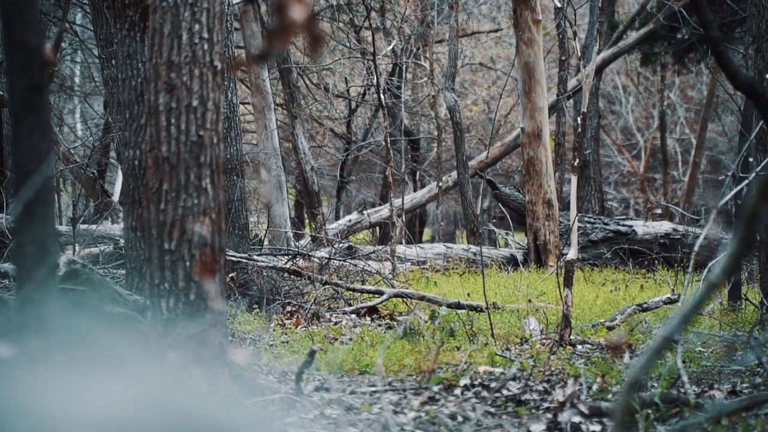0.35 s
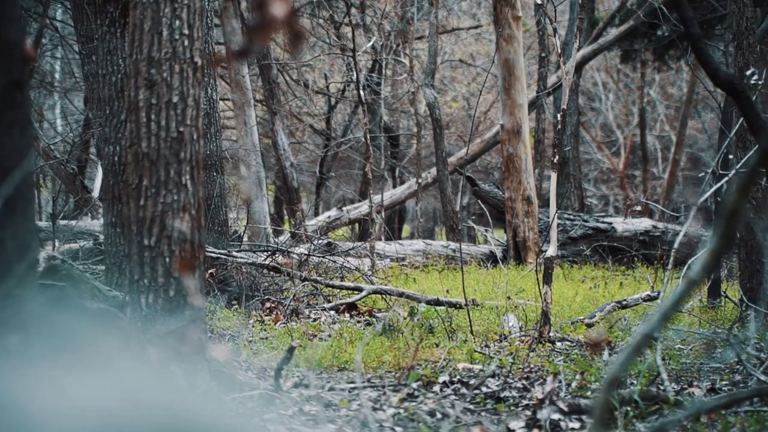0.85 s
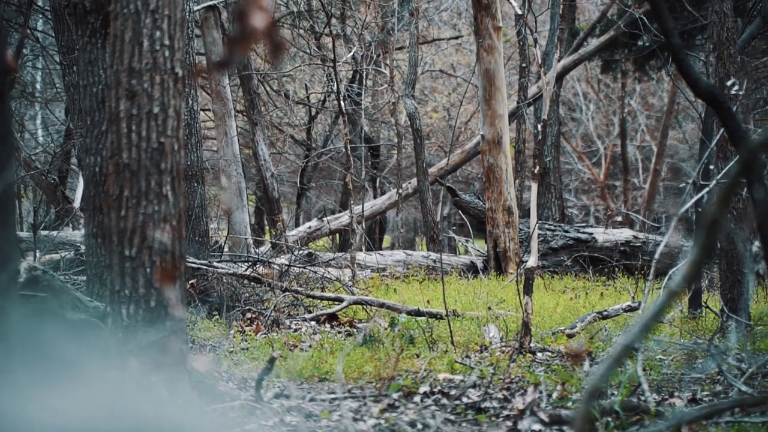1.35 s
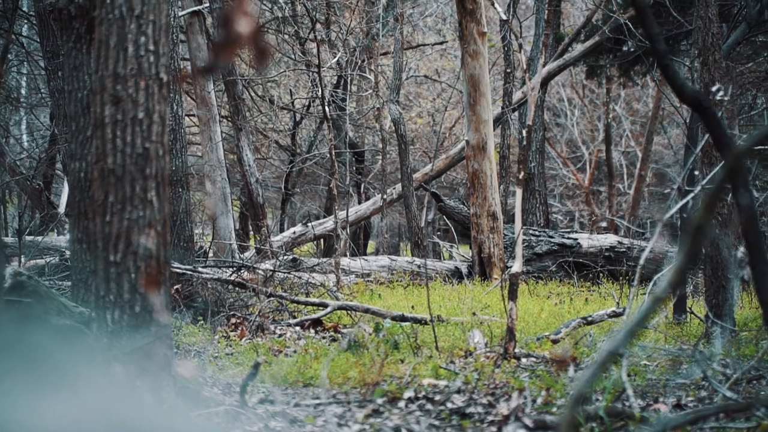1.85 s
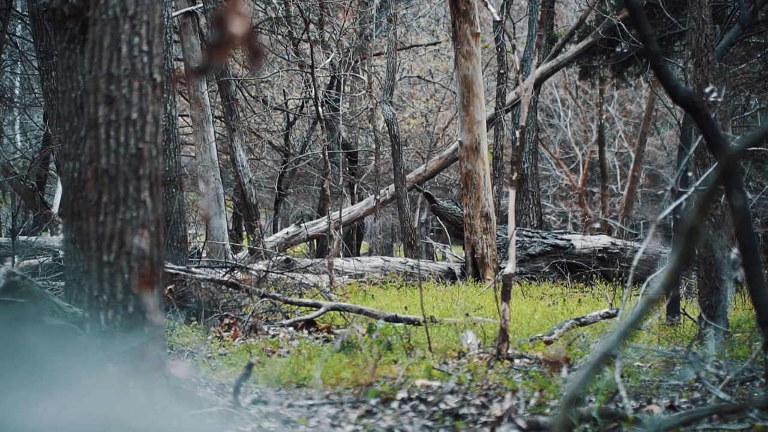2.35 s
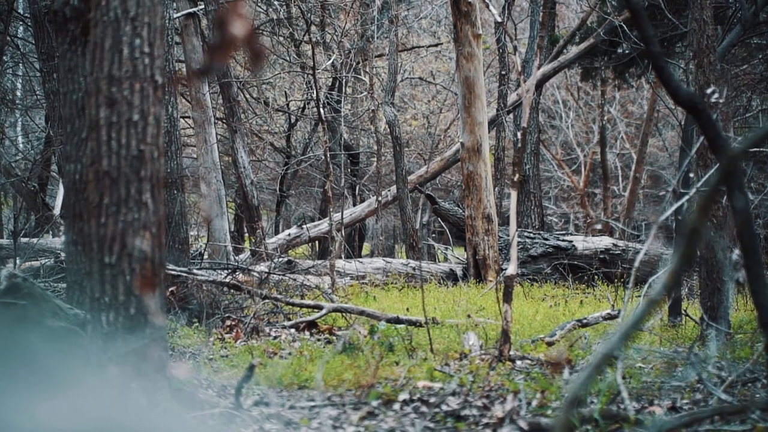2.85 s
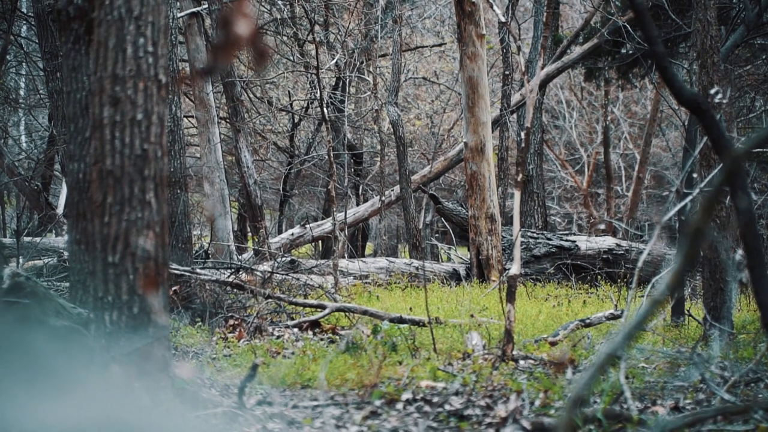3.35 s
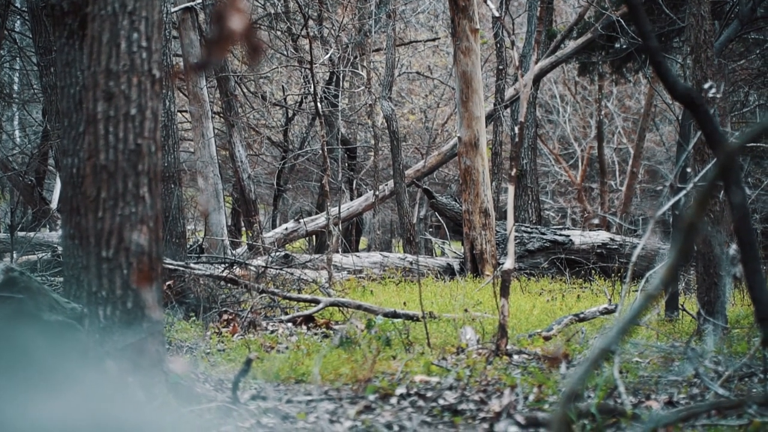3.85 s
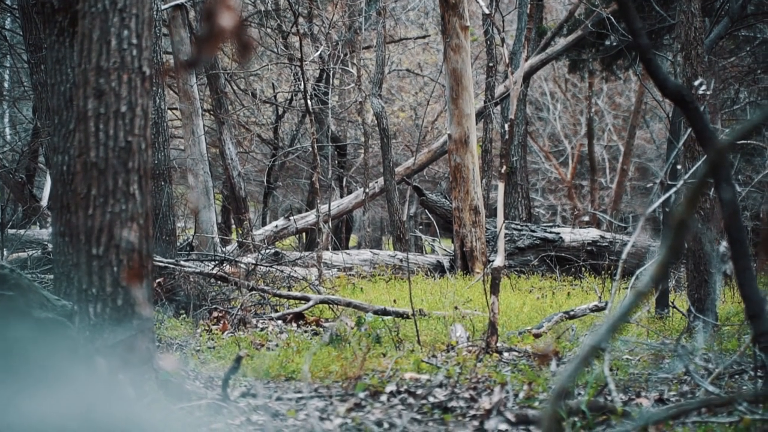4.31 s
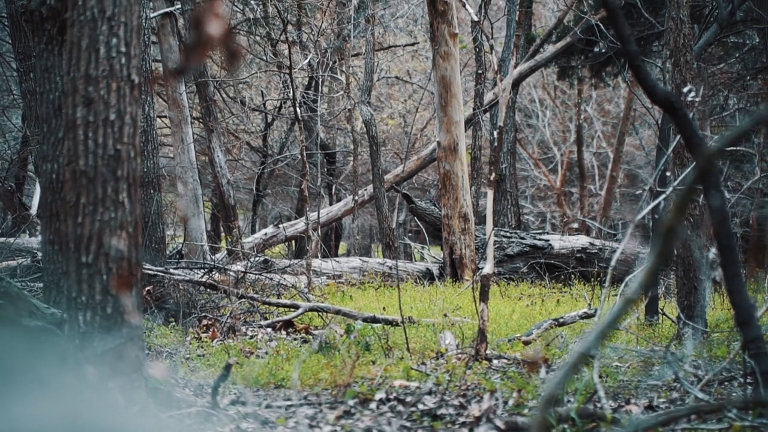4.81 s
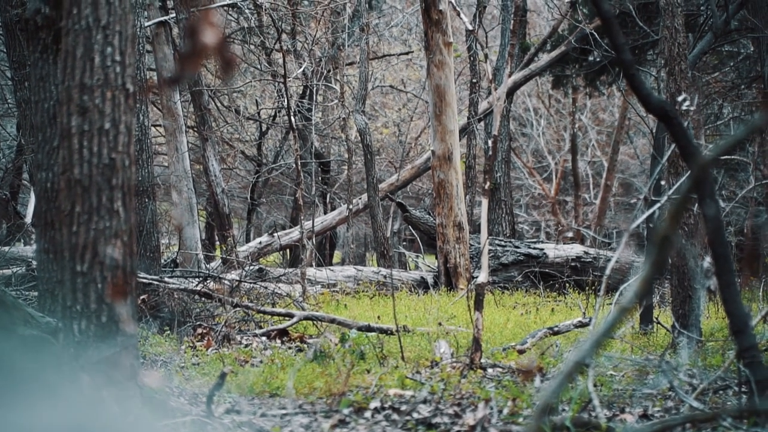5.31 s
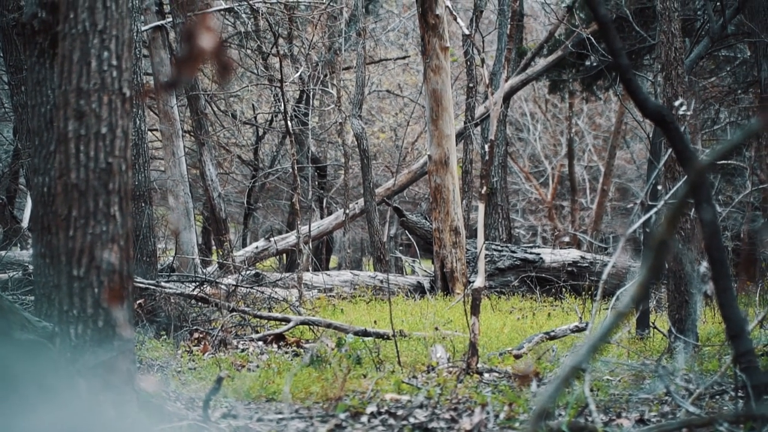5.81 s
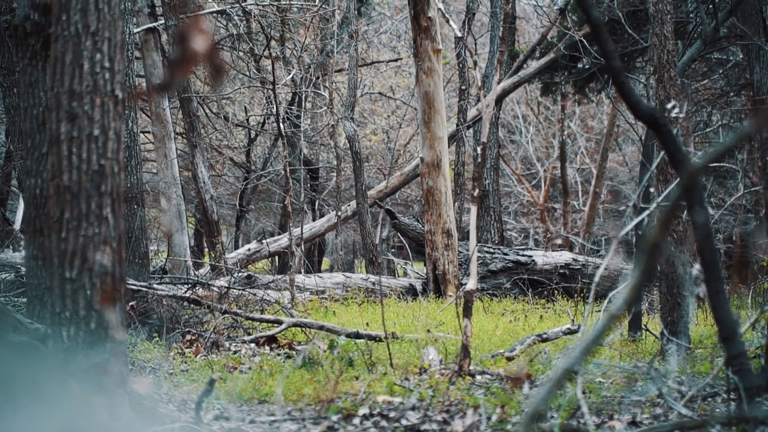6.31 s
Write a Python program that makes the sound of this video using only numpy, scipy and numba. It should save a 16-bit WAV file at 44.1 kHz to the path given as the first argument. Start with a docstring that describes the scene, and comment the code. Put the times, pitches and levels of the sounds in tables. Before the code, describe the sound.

A quiet woodland hush, dark and soft, with gentle low wind lumps on the microphone that ease slightly. From 0 to 3 s, breathy hoarse caws repeat far off, every half second or so; a thin two-voiced bird wheezes at 0.2 and 1.4 s, and faint whistles pass. A small woody knock comes at 2.1 s, a crisp tick at 2.8. At 3.1 s a distant turkey gobbles: a brighter opening bark, then rapid hoarse syllables sinking and fading until about 4.5 s, smeared by tree echoes. Around 4.6-4.9 s come ticks, tiny bird chips and a very high three-note song, with more caws. Close and almost dry, a thin whistle at 5.1 s dips then rises until 5.2; faint air and flaps follow. Three loud, nasal, raspy hen yelps, each about 0.13 s, burst at 5.4, 5.7 and 6.0 s, with slight echo, before the hush returns.

```python
"""Forest hush and light wind come first, with far hoarse caws, thin songbirds and small ticks over them.
A far turkey then gobbles, blurred by echoes from the trees: hoarse beats ring in a sinking windpipe.
Last come hen-turkey yelps close to the microphone, perhaps blown on a reed call: a whistle that dips and
then rises, and three raspy yelps. A fluttering membrane puffs air into a cavity that opens and shuts.
Birdsong is built from unsteady sines, caws, hush and wind from filtered noise, ticks from short rings."""
import sys
import numpy as np
from scipy import signal
from scipy.fft import rfft, irfft, next_fast_len
from scipy.io import wavfile
from scipy.ndimage import uniform_filter1d, minimum_filter1d, map_coordinates
from numba import njit

SR = 44100
rng = np.random.default_rng(int(sys.argv[2]) if len(sys.argv) > 2 else 0)


def int16_out(signal):
    """Quantize to a 16-bit WAV file."""
    q = np.round(np.clip(np.atleast_2d(signal).T, -1, 1) * 32767)
    wavfile.write(sys.argv[1], SR, q.astype(np.int16))


def boost(x):
    """Linear amplitude factor 10**(x/20) for a level x in decibels (scalar or array-like)."""
    u = np.asarray(x, float) / 20
    return 10 ** u


N = 283563  # length in samples

# The whistle before the yelps; levels are those entering the cavity.
# Columns: time_s, level_db, membrane_hz, rasp (0-1)
CALL_WHISTLE = [(5.064, -79.5, 1480, 0.54), (5.069, -39.5, 1515, 0.41), (5.086, -62, 1535, 0.5),
                (5.094, -38, 1530, 0.51), (5.104, -33, 1420, 0.05), (5.132, -36.5, 1288, .12),
                (5.16, -28, 1223, 0.05), (5.192, -24, 1280, 0.01), (5.209, -23, 1527, 0),
                (5.217, -41, 1816, 0)]
# The three raspy yelps; the last pip is a level change as each yelp closes.
# Columns: voice_on_s, burst_s, end_s, last_pip_db, every_fourth_beat (0-1)
CALL_YELPS = [(5.393, 5.411, 5.528, -8, 0.12), (5.699, 5.713, 5.824, -1.5, 1.0),
              (6.019, 6.029, 6.149, -8, 1)]
# The shape all yelps share, in three parts timed from voice on, burst and end; levels enter the cavity.
# Columns: time_from_mark_s, level_db, membrane_hz, cavity_low_edge_hz, rasp (0-1)
YELP_ONSET = [(0.00069, -21.5, 1490, 1050, 0.9)]
YELP_BURST = [(-.005, -13.5, 1512, 847.3, 0.78), (.002, -9, 1472, 771, 0.41), (.017, -16.5, 1362, 680, .65)]
YELP_CLOSE = [(-.046, -17, 1388, 689, .7), (-.03, -17.5, 1413, 843.2, 0.5), (-.011, -14, 1560, 1370, .2),
              (0, -41.5, 1530, 1500, .3)]
# Single flaps of the idle membrane, before the flap gain and the cavity. Columns: time_s, level_db
STRAY_FLAPS = [(5.2384, -47), (5.2589, -44), (5.2624, -43.5), (5.2684, -52), (5.2764, -51), (5.2824, -47),
               (5.2864, -51.5), (5.2914, -49), (5.3298, -49), (5.3344, -49), (5.365, -48.5), (6.006, -51.5)]
# Air slipping past the idle membrane, before its wavering and the cavity. Columns: time_s, level_db
AIR_LEAK = [(5.212, -48), (5.25, -55.5), (5.31, -71.5), (5.36, -55.5), (5.39, -50.5)]


def near_call():
    """A whistle with the cavity nearly shut, a pause of leaking air and stray flaps, then yelps of one shape."""
    out = np.zeros(N)
    start, (db, hz, rasp) = span(CALL_WHISTLE)
    # the treble dulls by 0.04 dB per Hz as the membrane tightens; rasp brightens it
    treble_db = 4.5 - 0.04 * (hz - hz.min()) + 16 * rasp
    second = np.full(len(hz), 0.12)
    fourth = np.zeros(len(hz))
    whistle = voiced(db, hz, 0.77 * hz, second, fourth, rasp, treble_db, breath_db=26)
    add(out, start, whistle)

    shut_hz, open_hz = 1340, 680  # low edge of the cavity when shut and open
    for on, burst, end, pip_db, fourth in CALL_YELPS:
        lead_s = 0.016 if on == CALL_YELPS[0][0] else 0.005  # the first yelp eases in longer
        rows = [(on - lead_s, -47, 1520, 1401, -0.3)]  # a thin start
        for mark, part in (on, YELP_ONSET), (burst, YELP_BURST), (end, YELP_CLOSE):
            rows += [(mark + s, *rest) for s, *rest in part]
        start, (db, hz, edge_hz, rasp) = span(rows)
        opening = np.clip((shut_hz - edge_hz) / (shut_hz - open_hz), 0, 1)
        pip_from = (end + YELP_CLOSE[1][0]) * SR
        pip_full = (end + YELP_CLOSE[2][0]) * SR
        db = db + pip_db * np.interp(start + np.arange(len(db)), [pip_from, pip_full], [0, 1])
        treble_db = 2.5 - 0.0872 * (hz - hz.min())
        second = 0.7 * opening ** 2
        yelp = voiced(db, hz, edge_hz, second, fourth * opening, rasp, treble_db, breath_db=19.5)
        add(out, start, yelp)

    flaps, breath = np.zeros(N), np.zeros(N)
    for s, db in STRAY_FLAPS:
        flaps[round(s * SR)] = boost(db + 18)
    start, (db,) = span(AIR_LEAK)
    leak = boost(db + 3 * wobble(150, len(db))) * rng.standard_normal(len(db))
    add(breath, start, leak)
    idle = cavity(flaps + boost(-5.5) * breath, breath, np.full(N, 1150), np.full(N, 15.0))
    return out + idle[:N]


def voiced(db, hz, edge_hz, second, fourth, rasp, treble_db, breath_db):
    """The membrane beats while air rushes past it; a rasping membrane wanders off its pitch."""
    hz = uniform_filter1d(hz, size=500, mode="nearest")  # the tension changes smoothly
    rasp = np.abs(rasp)
    hz = hz * (1 + 0.015 * rasp * wobble(60, len(hz)))
    breath = boost(db + breath_db) * (0.16 + rasp) * rng.standard_normal(len(db))
    puffs = boost(db) * beats(hz, second, fourth, rasp)
    return cavity(puffs, breath, edge_hz, treble_db)


def beats(hz, second, fourth, rasp):
    """A fluttering membrane: one puff a cycle, alternate puffs stronger, timing and size scattered by rasp."""
    cycles = np.cumsum(hz) / SR
    k = np.arange(1, int(cycles[-1]))
    at = np.interp(k, cycles, np.arange(len(hz)))  # puff times in samples
    i = at.astype(int)
    chance = np.tanh(rng.standard_normal((len(k), 2)) / 1.5) * 1.7  # no puff is extreme
    slip = 0.85 * rasp[i] * wobble(120, len(hz))[i]  # the four-beat pattern keeps losing its step
    # the full-rate tone weakens and breaks up as rasp grows
    main = 1 - rasp[i] * (0.8 + 0.5 * wobble(200, len(hz))[i])
    every_second = second[i] * (-1.) ** k
    every_fourth = fourth[i] * np.cos(np.pi * k / 2 + slip)
    size = main + every_second + every_fourth + 1.4 * rasp[i] * chance[:, 0]
    at = at + 0.19 * rasp[i] * chance[:, 1] * SR / hz[i]
    # each puff is a short windowed sinc, so it can fall between samples
    taps = np.floor(at)[:, None] + np.arange(-7, 9)
    lag = taps - at[:, None]
    height = (size * SR / hz[i] / np.sqrt(2))[:, None]
    puff = np.sinc(lag) * np.cos(np.pi * lag / 17) ** 2 * height
    places = np.clip(taps, 0, len(hz) - 1).astype(int)
    return np.bincount(places.ravel(), puff.ravel(), len(hz))


# Resonances of the cavity behind the call's membrane. Columns: centre_hz, width_hz, level_db
CAVITY_BODY = [(686, 390, -7.5), (1030, 400, -3), (1420, 290, 3), (2022, 310, -2)]
# Its treble resonances, with the same columns: centre_hz, width_hz, level_db
CAVITY_TOP = [(2867.8, 190, -17), (4387.3, 380, -8.5), (7000, 1000, -23.5), (10150, 580, -35.5),
              (13700, 1000, -53)]


def cavity(puffs, breath, edge_hz, treble_db):
    """The cavity behind the membrane; as it opens, its low edge sinks and bares the half-rate tone."""
    puffs, breath = np.pad([puffs, breath], ((0, 0), (0, 600)))  # room to ring out
    edge_hz, treble_db = np.pad([edge_hz, treble_db], ((0, 0), (0, 600)), "edge")
    opened = filtered(puffs, modes(CAVITY_BODY))
    for ratio, q in (1, 1.54), (0.97, 0.85), (0.68, 0.23):
        opened = moving(opened, ratio * edge_hz, q)[1]
    # a little low air passes through the cavity wall
    leak = boost(-31) * filtered(puffs, modes([(110, 120, -1.0), (335, 360, -6.5)]))
    top = modes(CAVITY_TOP)
    treble = filtered(boost(treble_db) * (puffs + breath), lambda f: top(f) / (1 + 1j * f / 9000) ** 2)
    rim = moving(puffs, edge_hz, q=3.5)[0]
    rim = boost(-5.0) * moving(rim, edge_hz, q=3)[0]  # the edge itself rings
    body = filtered(opened + rim + leak, lambda f: (1 + 1j * f / 3500) ** -4.0)
    return boost(4.5) * body + treble


# The far gobble, before the far-voice gain. Columns: time_s, level_db, first_resonance_hz
GOBBLE_CURVE = [(3.105, -76, 1140), (3.125, -55.5, 1188), (3.175, -59, 1184), (3.27, -53, 1244),
                (3.39, -55.5, 1103), (3.5, -58.5, 1030), (3.82, -60, 954.3), (4.17, -65.5, 930),
                (4.4, -67.5, 934), (4.6, -81, 931.5)]
# Its syllables; the ringing overtone is given before its slur. Columns: time_s, strength_db, ringing_hz
GOBBLE_SYLLABLES = [(3.115, 3, 3190), (3.17, 0, 3615), (3.2, 4, 4130), (3.262, 2.5, 3900),
                    (3.331, -1, 3400), (3.359, 1, 3260), (3.432, 5, 3260), (3.486, 1, 3106),
                    (3.528, -4, 3400), (3.572, 7.5, 3390), (3.614, -5, 3600), (3.652, 0.1, 3463),
                    (3.687, -3.5, 3210), (3.723, -1.5, 3080), (3.784, 3.5, 3599), (3.844, 5, 3244),
                    (3.883, -4, 3200), (3.936, -3, 3330), (3.988, 4, 3200), (4.103, 4, 3500),
                    (4.16, 7, 3611), (4.267, 3.5, 2985), (4.341, 8, 3198), (4.395, 3, 3057)]


def gobbler():
    """Hoarse syllables through a windpipe whose resonances sink as the neck stretches; each slurs down."""
    out = np.zeros(N)
    start, (db, first_hz) = span(GOBBLE_CURVE)
    s, strength_db, ring_hz = np.transpose(GOBBLE_SYLLABLES)
    t = (start + np.arange(len(db))) / SR
    since = t - t[0]
    k = np.clip(np.searchsorted(s, t) - 1, 0, None)  # the syllable now sounding
    age = np.abs(t - s[k])
    hump = age / 0.014 * np.exp(1 - age / 0.014)  # each syllable swells for 14 ms, then fades
    syllable = 0.2 + boost(strength_db)[k] * hump
    slur = 1.05 - 2.5 * np.minimum(age, 0.05)
    # hoarse but still pitched
    voice = beats(slur * first_hz / 3, 0 * t, 0 * t, 0.27 + 0 * t) * syllable

    def pipe(hz, q):
        """A windpipe resonance, filtered twice."""
        once = moving(voice, hz, q)[0]
        return unit(moving(once, hz, q)[0])

    first = pipe(first_hz, q=5)
    first += boost(-16.5) * pipe(0.602 * first_hz, q=7.1)
    first += boost(-39.5 + 26.0 * since) * pipe(first_hz / 3.57, q=12)
    second_hz = 1692 - 160 * since
    first_db = -16 * np.exp(-since / 0.12)  # the first resonance wakes a moment late
    second_db = -5.5 + 6 * np.exp(-since / 0.17)
    third_db = -9 + 13 * np.exp(-since / 0.044)  # the opening bark is bright
    low = boost(first_db) * first + boost(third_db) * pipe(1.28 * second_hz, q=6)
    low += boost(second_db) * pipe(second_hz, q=5)

    beak = modes([(3400, 600, 7), (4400, 900, 8), (5600, 930, 11)])
    high = unit(filtered(voice, lambda f: beak(f) / (1 + 1j * f / 5000) ** 4))
    high = boost(-5) * high + boost(-8) * pipe(slur * ring_hz[k], q=18)
    # the treble does not follow 0.4 of a syllable's extra strength, and scatters by 3 dB
    beak_db = -3 - 0.4 * strength_db + 3 * rng.standard_normal(len(s))
    beak_gain = boost(beak_db[k] - 3 * since)  # the treble fades 3 dB a second

    chest = unit(filtered(rng.standard_normal(len(t)), modes([(89.5, 21, 0)])))
    swell = boost(-68) * np.exp(-((t - 3.75) / 0.45) ** 2)  # one slow swell
    add(out, start, boost(db) * (low + beak_gain * high) + swell * chest)
    return out


# A two-voiced songbird; pitches are the unsounded base notes before their bend, levels before the shape.
# Columns: start_s, length_s, level_db, lower_pitch_hz, upper_pitch_hz
BIRD_WHEEZES = [(.205, .335, -76.5, 2300, 2620), (1.385, .365, -81.5, 2430, 2880),
                (3.05, .3, -80, 2280, 2700), (4.965, .135, -76.5, 2300, 2670)]
# The overtones sounded by each voice. Columns: multiple of the base pitch, level_db
LOWER_OVERTONES = [(2, -10), (3, -2), (4, -16)]
UPPER_OVERTONES = [(2, -11), (3, -5)]
# Thin whistles of other songbirds, before flutter.
# Columns: start_s, length_s, level_db, first_pitch_hz, last_pitch_hz
BIRD_WHISTLES = [(1.277, 0.1126, -81, 8700, 7515), (2.29, .1, -84, 5707, 6096),
                 (2.52, .09, -87, 6560, 6810), (2.84, 0.26, -89.5, 3830, 3760)]
# A very high song of three quick notes, one curve each, before flutter. Columns: time_s, level_db, pitch_hz
HIGH_NOTES = [
    [(4.575, -83, 10200), (4.6, -74, 9850), (4.635, -71, 9330), (4.71, -72, 9700), (4.722, -88, 9800)],
    [(4.726, -88, 8600), (4.731, -71, 9000), (4.742, -78, 9800), (4.75, -88, 9800)],
    [(4.754, -93, 8400), (4.759, -69, 8900), (4.775, -77, 9450), (4.805, -70, 9330), (4.82, -76, 9700),
     (4.87, -88, 9560)],
]


def songbirds():
    """Overtones from both halves of a syrinx (a bird's voice box), single whistles and a high song."""
    out = np.zeros(N)
    rise_s = 0.03
    for s, length, db, lower_hz, upper_hz in BIRD_WHEEZES:
        t = np.arange(round(length * SR)) / SR
        scoop = 1 - 0.27 * np.exp(-3 * t / rise_s)
        edges = np.exp(-3 * t / rise_s) + np.exp(-(length - t) / rise_s)
        shape_db = -11.5 * edges - 12 * t  # soft ends and a 12 dB per second fade
        # sag: the share of pitch each voice would lose in the long run
        for hz, sag, voice in (lower_hz, 0.26, LOWER_OVERTONES), (upper_hz, 0.19, UPPER_OVERTONES):
            bend = scoop * (1 - sag * (1 - np.exp(-np.maximum(t - rise_s, 0) / 0.3)))
            for k, level in voice:
                overtone = boost(db + shape_db + level) * tone(k * hz * bend, flutter_db=4.0)
                add(out, round(s * SR), overtone)
    for s, length, db, first_hz, last_hz in BIRD_WHISTLES:
        u = np.linspace(0, 1, round(length * SR))
        swell = np.sqrt(np.abs(np.sin(np.pi * u)))
        glide_hz = last_hz + (first_hz - last_hz) * np.exp(-6 * u)
        add(out, round(s * SR), boost(db) * swell * tone(glide_hz, flutter_db=5.0))
    for rows in HIGH_NOTES:
        start, (db, hz) = span(rows)
        add(out, start, boost(db) * tone(hz, flutter_db=7))
    return out


def tone(hz, flutter_db):
    """A sine, of rms 1 before its level flutters, with a slightly drifting pitch."""
    hz = uniform_filter1d(hz, size=250, mode="nearest")
    drift = 1 + 0.0052 * wobble(70, len(hz))
    flutter = boost(flutter_db * wobble(43.2, len(hz)))
    return np.sqrt(2) * flutter * np.sin(2 * np.pi * np.cumsum(hz * drift) / SR)


# Far hoarse caws; levels are before the fade. Columns: start_s, level_db, pitch_hz
FAR_CAWS = [(0.019, -71, 1224), (.58, -72, 1220), (1.102, -79.5, 1270), (1.73, -76.5, 1235),
            (2.06, -70, 1226), (2.42, -73.5, 1340), (2.971, -76.5, 1285), (4.499, -74, 1376),
            (4.919, -71.5, 1237)]


def caws():
    """Breathy notes: noise rings at a pitch and its octave, then fades slowly."""
    out, t = np.zeros(N), np.arange(SR // 2) / SR
    for s, db, hz in FAR_CAWS:
        note = modes([(hz, 70, 0), (2 * hz, 110, -4)])
        ringing = filtered(rng.standard_normal(len(t)), note)
        breath = unit(filtered(ringing, lambda f: np.abs(note(f)) ** 0.5))
        fade = boost(db - 60 * (t / 0.77) ** 1.74)
        attack = 1 - np.exp(-t / 0.00396)
        add(out, round(s * SR), fade * attack * breath)
    return out


# Small ticks and knocks nearby; the click level is relative to the tick's own.
# Columns: time_s, level_db, pitch_hz, ring_cycles, click_db
SMALL_TICKS = [(1.098, -62, 2400, 8.1, -25), (1.998, -56, 507, 2.1, -23.5), (2.078, -37, 666.3, 2.744, -11),
               (2.211, -47, 215.8, 0.51, -31.5), (2.802, -44.5, 8523, 3.5, 1), (4.171, -69.5, 4000, 1.7, 5),
               (4.542, -49, 2060, 4.5, -10), (4.613, -59, 7200, 3.6, -7), (4.764, -57, 1514, 18.1, -6.5),
               (4.915, -65, 7300, 8.8, -6)]
# A small bird's chips. Columns: time_s, level_db
BIRD_CHIPS = [(4.659, -56.5), (4.693, -58), (4.772, -60), (4.81, -68.5)]


def ticks():
    """A short ring with a noisy click on top; the chips all ring at one pitch."""
    out, t = np.zeros(N), np.arange(SR // 20) / SR
    chips = [(s, db, 4110, 15, -3) for s, db in BIRD_CHIPS]
    for s, db, hz, cycles, click_db in SMALL_TICKS + chips:
        life = cycles / hz
        envelope = np.exp(-2 * t / life) * (1 - np.exp(-8 * t / life))
        ring = np.sin(2 * np.pi * hz * t) * envelope
        click_modes = modes([(2150, 1200, -12.0), (4730, 540, -4), (7332, 2400, -20.0)])
        click = unit(filtered(rng.standard_normal(len(t)), click_modes))
        click = boost(click_db) * click * np.exp(-t / (0.00089 + 0.12 * life))
        add(out, round(s * SR), boost(db) * (1.54 * ring + click))
    return out


# Tone colour of the forest hush; only relative levels matter. Columns: frequency_hz, level_db (per Hz)
HUSH_COLOUR = [(53, -43.5), (90, -1), (172, -5.5), (294, -7.5), (389, -12.5), (493, -9.5), (826, -11),
               (882, -10), (1910, -15.5), (2320, -19.5), (3650, -28), (5200, -32), (6960, -33),
               (11000, -36), (15400, -47)]
# Tone colour of wind on the microphone; only relative levels matter. Columns: frequency_hz, level_db (per Hz)
WIND_COLOUR = [(7.1, -27.5), (12, 9.5), (28, -9), (61, -15.5), (81, -37.5), (110, -41.5), (140, -68.5),
               (240, -120)]
# Strength of the wind, before its lumps. Columns: time_s, level_db
WIND_LEVEL = [(0.0, -53), (1.3, -54), (2.2, -54.5), (3.0, -54.5), (4.7, -57), (6.43, -57.5)]


def air():
    """The forest hush and wind lumps on the microphone, both made of coloured noise."""
    def noise(spectrum):
        return unit(filtered(rng.standard_normal(N), lambda hz: boost(along(spectrum, hz))))

    sway_db = 0.5 * wobble(1.5, N)
    out = boost(-70 + sway_db) * noise(HUSH_COLOUR)
    start, (db,) = span(WIND_LEVEL)
    lumps_db = 2.5 * wobble(8, len(db))
    add(out, start, boost(db + lumps_db) * noise(WIND_COLOUR)[:len(db)])
    return out


# How long echoes among the trees take to fall by 60 dB. Columns: frequency_hz, fall_time_s
TREE_ECHO = [(300, 0.27), (1400, 0.85), (2500, 0.5), (4500, 0.32), (12000, 0.27)]


def trees(x, gap):
    """Trunks scatter the sound back after a gap in seconds; each frequency dies at its own speed."""
    hz, t, z = signal.stft(rng.standard_normal(SR), SR, nperseg=256)
    decay = boost(-60 * t / along(TREE_ECHO, hz)[:, None])
    tail = signal.istft(z * decay, SR, nperseg=256)[1]
    delayed = np.pad(x, (round(gap * SR), 0))
    return signal.fftconvolve(delayed, tail / np.linalg.norm(tail))[:N]


def unit(x):
    """Scaled to rms 1."""
    return x / np.sqrt(np.mean(x ** 2) + 1e-20)


def along(points, hz):
    """Reads a curve of (Hz, value) points on a log frequency axis."""
    f, v = np.transpose(points)
    return np.interp(np.log(hz + 1), np.log(f + 1), v)


def span(rows):
    """First sample and one value per sample for each column after the time."""
    s, *cols = np.transpose(rows)
    n = np.arange(round(s[0] * SR), min(N, round(s[-1] * SR)))
    return n[0], [np.interp(n / SR, s, c) for c in cols]


def add(out, start, x):
    """Mixes x into out from the start sample."""
    out[start:start + len(x)] += x[:len(out) - start]


def wobble(rate, size):
    """A smooth random curve, rate knots a second."""
    knots = rng.standard_normal(int(size * rate / SR) + 4)
    return map_coordinates(knots, [np.arange(size) * rate / SR])


def filtered(x, response):
    """Multiplies the spectrum of x by a response of frequency."""
    m = next_fast_len(len(x) + 8192)
    return irfft(rfft(x, m) * response(np.fft.rfftfreq(m, 1 / SR)), m)[:len(x)]


def modes(table):
    """Causal response of (Hz, width Hz, dB) resonances with alternating signs."""
    def response(f):
        total = 0
        for k, (centre, width, db) in enumerate(table):
            loss = 1j * f * width
            total = total + (-1) ** k * boost(db) * loss / (centre * centre - f * f + loss)
        return total
    return response


@njit
def sweep(x, turn, damping):
    """A resonator whose tuning moves: its band-pass and high-pass outputs."""
    band, high, b, low = np.zeros(len(x)), np.zeros(len(x)), 0.0, 0.0
    for n in range(len(x)):
        high[n] = x[n] - low - damping * b
        b += turn[n] * high[n]
        low += turn[n] * b
        band[n] = damping * b
    return band, high


def moving(x, hz, q):
    """The moving resonator, tuned in Hz; a higher q is narrower, with a floor of 0.5."""
    return sweep(x, 2 * np.sin(np.pi * hz / SR), 1 / max(q, 0.5))


def scene():
    """Near call almost dry, far voices half lost in echoes."""
    near, far, birds = near_call(), boost(-3) * gobbler(), songbirds()
    echoes = boost(-44.5) * trees(near, gap=0.042) + boost(-3) * trees(far, gap=0.02)
    bird_echoes = boost(-5.5) * trees(birds, gap=0.0093)
    return (near + far + echoes + birds + bird_echoes + caws() + ticks() + air())[None]


def low_pass(x):
    """Removes everything above the highest recorded frequency."""
    return signal.sosfilt(signal.butter(12, 15590, fs=SR, output="sos"), x)


def record(dry):
    """A fast limiter holds the peaks to 0.97 of full scale, then the band above 15.5 kHz is cut."""
    need = np.minimum(1, 0.97 / (np.abs(dry[0]) + 1e-9))
    gain = uniform_filter1d(minimum_filter1d(need, size=89), size=89)  # 2 ms
    mix = filtered(gain * dry[0], lambda hz: hz < 15500)[None]
    return low_pass(mix)


dry = scene()
out = record(dry)
int16_out(out)
```